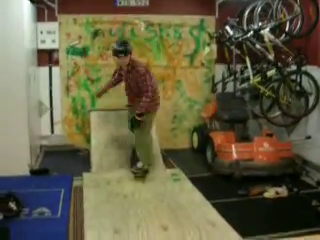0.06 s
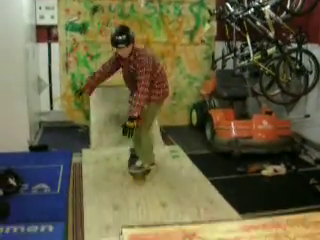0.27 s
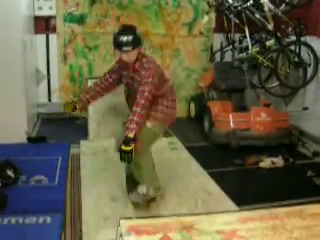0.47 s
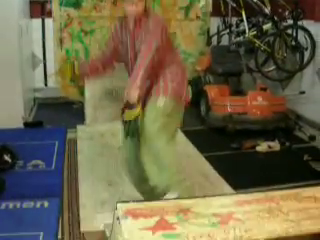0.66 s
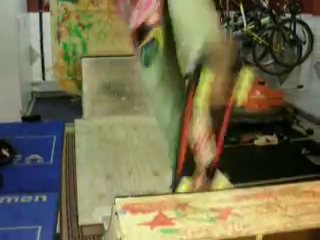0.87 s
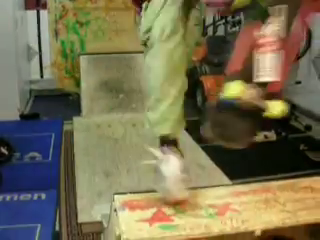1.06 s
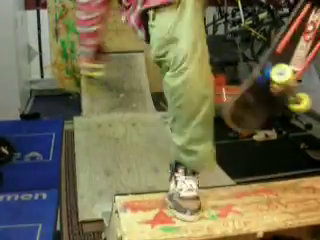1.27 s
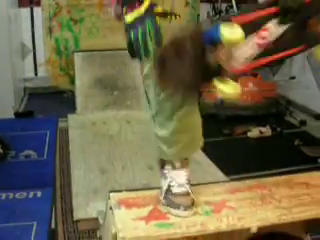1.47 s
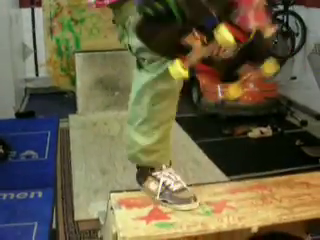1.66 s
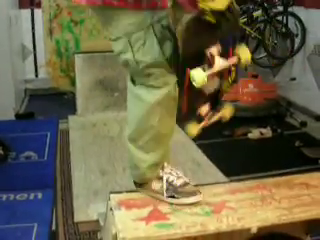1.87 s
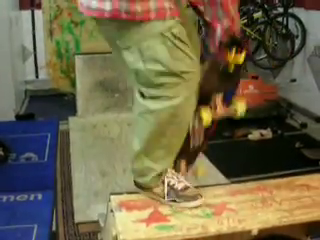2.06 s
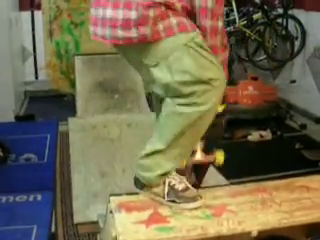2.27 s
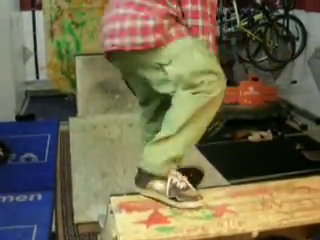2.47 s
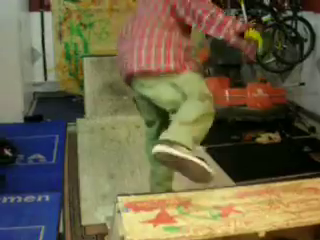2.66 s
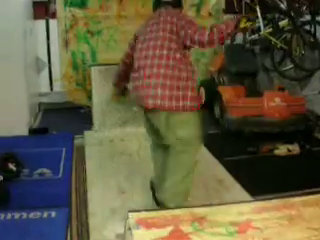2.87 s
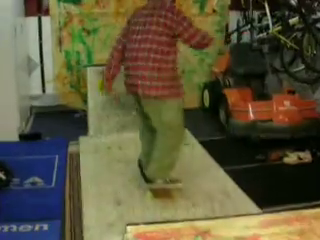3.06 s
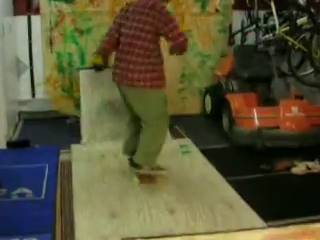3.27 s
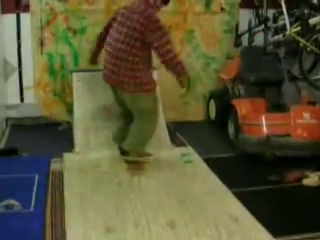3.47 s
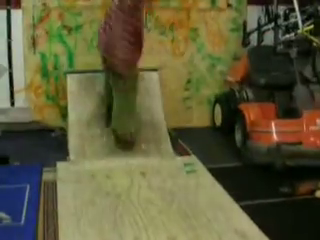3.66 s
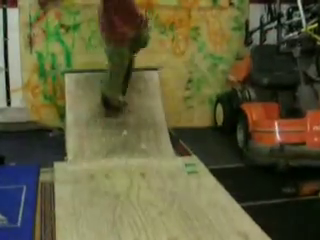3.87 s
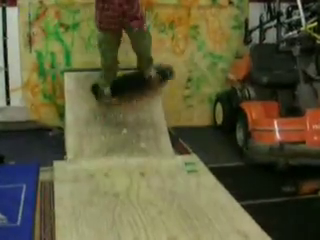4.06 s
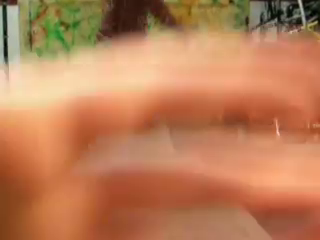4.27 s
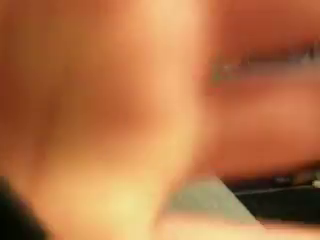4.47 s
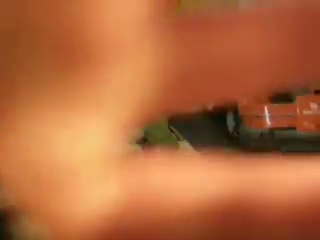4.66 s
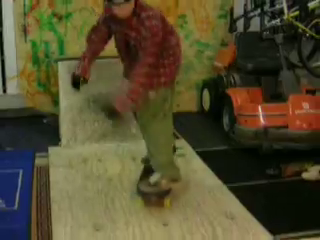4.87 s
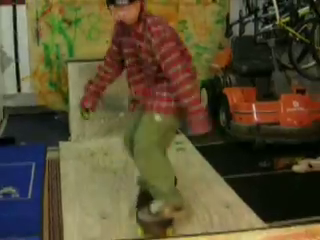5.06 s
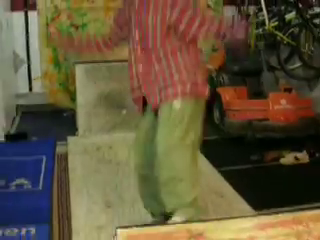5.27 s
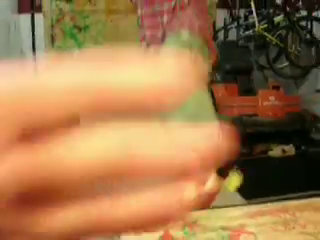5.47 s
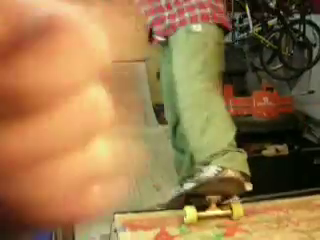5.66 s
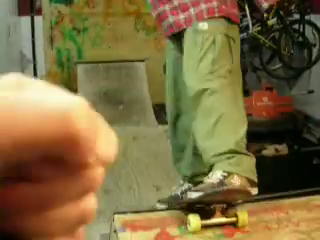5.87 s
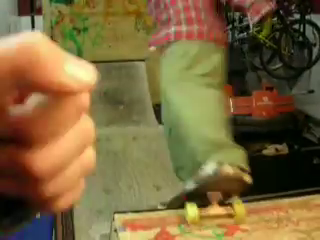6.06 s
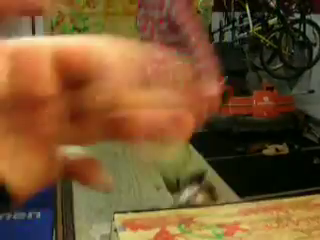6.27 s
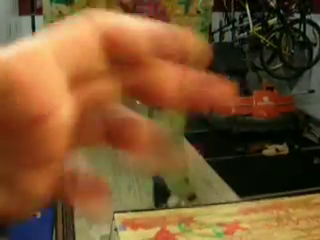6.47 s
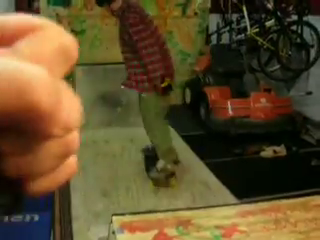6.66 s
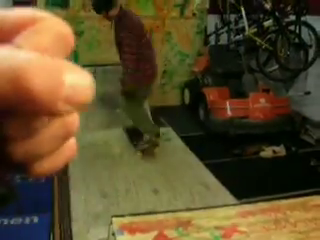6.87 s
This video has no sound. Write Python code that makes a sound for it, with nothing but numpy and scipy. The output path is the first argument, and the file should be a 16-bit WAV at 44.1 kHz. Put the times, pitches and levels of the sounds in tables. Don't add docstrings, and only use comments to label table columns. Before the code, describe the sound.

Close, boxy skateboarding indoors: wheels drum on plywood in uneven passes, broken by dull raps, sharp slaps and booming board landings.

```python
import sys
import numpy as np
from scipy import signal
from scipy.fft import rfft, irfft
from scipy.io import wavfile
from scipy.ndimage import uniform_filter1d

SR = 44100
rng = np.random.default_rng(int(sys.argv[2]) if len(sys.argv) > 2 else 0)


def gain_from_db(level_db):
    decades = np.asarray(level_db, float) / 20
    return 10 ** decades


def master(y):
    cut = np.clip(np.atleast_2d(y).T, -1, 1)
    pcm = np.round(cut * 32767)
    wavfile.write(sys.argv[1], SR, pcm.astype(np.int16))


N = 306054

# (frequency [Hz], width [Hz], level [dB])
PLYWOOD = [(114.05, 47, -14.5), (229.93, 27.4, 1.5), (290.36, 32.953, 1.5), (351.79, 45.64, 1),
           (451.1, 55, -2), (534.77, 47, 0.5), (628, 70, -0.5), (814.58, 140, -3.5), (849.5, 350, -15.5)]


def band(x, hz, width):
    return signal.lfilter(*signal.iirpeak(hz, hz / width, fs=SR), x)


def unit(x):
    return x / np.sqrt(np.mean(x ** 2))


def peak(x):
    return x / np.abs(x).max()


def body(x, modes):
    total = 0
    for k, (hz, width, db) in enumerate(modes):
        total = total + (-1) ** k * gain_from_db(db) * band(x, hz, width)
    return unit(total)


def grit(per_s, spread_db):
    hit = rng.random(N) < per_s / SR
    size_db = spread_db * np.minimum(rng.exponential(size=N), 3.5)
    return hit * rng.choice([-1, 1], N) * gain_from_db(size_db)


def flicker(rate):
    k = int(SR / rate)
    held = np.repeat(rng.standard_normal(N // k + 1), k)
    return gain_from_db(1.5 * uniform_filter1d(held, k)[:N])


def swells(start, stop, db, rise_db_per_s, fall_db_per_s):
    t = np.arange(0, N, 32)[:, None] / SR
    climb_db = rise_db_per_s * np.maximum(start - t, 0)
    fall_db = fall_db_per_s * np.maximum(t - stop, 0)
    return gain_from_db(db - climb_db - fall_db)


def layer(*parts):
    power = sum(np.sum((gains * gain_from_db(db)) ** 2, axis=1) for gains, db in parts)
    return np.interp(np.arange(N), np.arange(0, N, 32), np.sqrt(power))


def rolling():
    # (frequency [Hz], width [Hz], level [dB])
    deck = [(948.4, 510.1, -4), (1471.2, 401.64, -2.5), (1760.5, 335.77, -5.5)]
    # (frequency [Hz], width [Hz], level [dB])
    hiss_modes = [(2334.2, 500, -3.5), (3131.8, 892.9, 10), (3233.7, 1229.4, 8.5)]
    # (start [s], stop [s], rumble level [dB], hiss re rumble [dB])
    pass_rows = [
        (0.0, 1.076, -24, -21.5),
        (2.326, 3.72, -25, -9.5),
        (4.427, 5.26, -23.5, -8),
        (6.264, 6.939, -23, -10),
    ]
    # (peak time [s], rumble level [dB], time to fall 10 dB [s], hiss re rumble [dB])
    surge_rows = [(0.11, -13.5, 0.2484, -28), (0.46, -15, .1, -45), (0.55, -16, .15, -40),
                  (0.62, -12, 0.2351, -40), (0.79, -19, 0.1235, -28.5), (2.45, -18, 0.1722, -16),
                  (3.22, -24, .15, -14), (3.38, -20, 0.2348, -10.5), (3.53, -17.5, 0.2082, -6.5),
                  (4.45, -16, .1, -20.5), (4.76, -17.5, 0.2373, -16), (5.0, -20, 0.1754, -14.5),
                  (5.18, -17, .1, -12), (5.245, -13, .04, -11), (6.33, -22, 0.1188, -14),
                  (6.47, -14.5, 0.104, -10), (6.606, -18, 0.1753, -15), (6.94, -11.5, 0.2115, -10)]
    # (peak time [s], scuff level [dB], time to fall 10 dB [s], hiss re scuff [dB])
    scuff_rows = [(0.03, -21, .15, -9), (0.2, -27, .12, -10), (1.01, -22.5, 0.1599, -20.5),
                  (1.08, -27, 0.0011, -9), (1.26, -25.5, .1, -12), (1.31, -23.5, .1, -14),
                  (1.45, -30, 0.2128, -24), (1.58, -24, .2, -28), (1.7, -22.5, 0.193, -23.5),
                  (1.82, -23, .07, -30), (1.99, -22, 0.1224, -21.5), (2.12, -29.5, 0.3253, -15),
                  (2.438, -21.5, 0.0359, -14), (2.72, -35, .15, -1), (2.861, -28.5, 0.0687, 4.5),
                  (2.98, -26, 0.098, -11.5), (3.45, -28.5, 0.1172, -7), (3.627, -28.5, 0.0518, 8.5),
                  (3.97, -35, 0.2633, -5), (4.22, -28, .16, -2), (4.415, -20.5, 0.0184, -12),
                  (4.63, -26.5, 0.1023, -4.5), (5.199, -21.5, 0.1154, -4.5), (5.41, -31, .15, 1),
                  (5.62, -43, 0.6066, 4), (6.19, -42, .15, 3), (6.282, -24, 0.0579, -10)]

    start, stop, db, pass_hiss_db = np.transpose(pass_rows)
    passes = swells(start, stop, db, rise_db_per_s=301, fall_db_per_s=42)
    s, db, fall_s, surge_hiss_db = np.transpose(surge_rows)
    surges = swells(s, s, db, 10 / (0.49294 * fall_s), 10 / fall_s)
    s, db, fall_s, scuff_hiss_db = np.transpose(scuff_rows)
    scuffs = swells(s, s, db, 10 / (0.6235 * fall_s), 10 / fall_s)

    bumps = grit(per_s=1500, spread_db=2.5)
    rumble = flicker(33) * body(bumps, PLYWOOD)
    scrape = body(grit(per_s=2600, spread_db=2.0) + 0.64 * bumps, deck)
    scuff = flicker(40) * unit(band(scrape, 2056.2, 1500))
    hiss = flicker(45) * body(grit(per_s=6400, spread_db=-3.0) + .5 * bumps, hiss_modes)

    surge_scuff_db = -5 + .3 * surge_hiss_db
    rumble_gain = layer((passes, 0), (surges, 0), (scuffs, -7))
    scuff_gain = layer((passes, -8.5), (surges, surge_scuff_db), (scuffs, 0))
    hiss_gain = layer((passes, pass_hiss_db), (surges, surge_hiss_db), (scuffs, scuff_hiss_db))
    return rumble_gain * rumble + scuff_gain * scuff + hiss_gain * hiss


def air():
    # (frequency [Hz], density [dB per Hz])
    spectrum = [(15, -33.5), (25, 11.5), (60, -27), (176, -27.5), (275, -16.5), (412, -30), (658, 16.5),
                (867, -1.5), (4000, -24.5), (5200, -50), (8800, -120)]
    hz, db = np.transpose(spectrum)
    f = np.arange(N // 2 + 1) * SR / N + 1
    shape = gain_from_db(np.interp(np.log(f), np.log(hz), db))
    return gain_from_db(-46) * unit(irfft(rfft(rng.standard_normal(N)) * shape, N))


def knocks():
    raps = [(0.069, -1.5, 398, 9), (0.083, -5, 486.6, 2), (0.174, -2.5, 836.2, -4), (0.268, -4.5, 732, -3),
            (1.046, -8, 683.8, 5), (1.23, -20, 657, 8), (1.299, -21, 700, 2), (1.797, -8, 950, -2),
            (1.837, -13, 927.4, -2), (2.309, -8.5, 599.5, -4), (6.149, -24, 628.4, 5),
            (6.792, -15, 460, 10)]
    thumps = [(0.092, -9.5, 458, 8), (0.627, -11, 550.5, -3), (0.999, -8.5, 799, 3), (2.334, -9, 706.1, -8),
              (2.526, -6, 685, -3), (2.649, -20, 586.8, 8), (2.82, -20, 798, -2), (3.487, -7.5, 664.2, -8),
              (4.945, -9.5, 528.7, 9), (5.205, -7, 580, 2), (6.101, -22, 900, 17), (6.589, -5.5, 572.5, 3)]
    slaps = [(0.435, -7.5, 540, -30), (0.546, -6, 589, -22), (0.683, -3, 630, -4), (0.763, -8, 800, -20),
             (0.891, -6, 660, -10), (3.587, -9, 702, 9), (4.401, -6.5, 530, 3), (5.38, -11, 794, -3),
             (5.736, -3.5, 681, 2), (6.134, -7, 670, -14), (6.257, -4.5, 956, -6)]
    cracks = [(1.631, -20, 895.6, -5), (1.959, -16.5, 637.9, 0), (2.408, -7, 646, 1),
              (2.544, -6, 610.3, -1), (2.981, -5.5, 549.5, -2), (3.604, -10.5, 533.4, -8),
              (3.702, -6, 616.6, 1), (4.17, -28, 925.9, 0), (4.589, -5, 516, -3), (4.724, -5.5, 714.4, -6),
              (6.53, -13.5, 428.7, 1)]
    slams = [(2.266, -5, 677.4, -1), (2.429, -8.5, 606.9, 0), (2.852, -6.5, 632.9, 0),
             (2.964, -17.5, 610, 4), (3.342, -20.5, 519.8, -1), (3.452, -13.5, 630, -2),
             (4.421, -8.5, 407.3, -3), (4.924, -12, 372, -4), (5.102, -10.5, 412, -4), (5.275, -14, 816, 9),
             (6.297, -7, 719, 0), (6.49, -6, 551.8, -2), (6.619, -17.5, 628, -2)]
    # (blows, crack [dB], ramp boom [dB], room share [dB])
    kinds = [(thumps, -26, 0.5, -9), (slams, -6.5, -0.5, -7.5), (raps, -26.5, -16.5, -8.5),
             (cracks, -5, -20.5, -6), (slaps, -5, -18, -11)]

    blows = [(*row, *kind) for rows, *kind in kinds for row in rows]
    out = np.zeros(N + SR)
    t = np.arange(int(.2 * SR)) / SR

    def decay(t60):
        return gain_from_db(-60 * t / t60)

    for blow, tail in zip(blows, echoes(count=len(blows))):
        s, db, hz, hard_db, crack_db, boom_db, share_db = blow
        share_db = share_db - .15 * (db + 9.5)
        crack_db = crack_db + hard_db
        noise = rng.standard_normal((3, len(t)))
        ring = np.sin(2 * np.pi * hz * t) + 0.3563 * np.sin(2 * np.pi * 1.5 * hz * t)
        rattle = unit(band(noise[0], hz, 1.1 * hz)) * decay(0.066975)
        crack = gain_from_db(crack_db + 8.0) * peak(band(noise[1], 1700, 2300) * decay(0.047))
        push = decay(0.0048) + 0.41 * noise[2] * decay(0.021)
        boom = gain_from_db(min(boom_db, 2)) * peak(body(push, PLYWOOD[:6]))
        near = 1.15 * ring * decay(.045) + 0.4907 * rattle + crack + boom

        click = band(t == 0, 2200, 4500)
        sent = 2.4066 * ring * decay(0.009532) + 28.618 * gain_from_db(crack_db) * click + boom
        heard = gain_from_db(share_db + 5.5) * signal.fftconvolve(sent, tail)
        heard[:len(t)] += near
        contact_hz = min(9000 * gain_from_db(.4 * crack_db), SR / 4)
        heard = signal.lfilter(*signal.butter(2, contact_hz, fs=SR), heard)
        at = int(s * SR)
        out[at:at + len(heard)] += gain_from_db(db) * heard
    return out[:N]


def echoes(count):
    # (centre [Hz], time to fall 60 dB [s], level [dB])
    room = [(193.7, 0.77, -1), (278.26, 0.48682, 9), (540, 0.6095, 2.5), (875.3, 0.7633, 2.5),
            (1312, 0.44324, 12), (1931.6, 0.3061, 14), (3460, 0.98, -19)]
    t = np.arange(int(.7 * SR)) / SR
    starts = rng.integers(0, 2 * SR, count)
    tails = 0
    for hz, t60, db in room:
        noise = band(band(rng.standard_normal(3 * SR), hz, 1.0575 * hz), hz, hz)
        tails = tails + gain_from_db(db - 60 * t / t60) * noise[starts[:, None] + np.arange(len(t))]
    tails = tails * np.clip(t / .008, 0, 1) ** 2
    return tails / np.sqrt(np.sum(tails ** 2, axis=1, keepdims=True))


def overloads():
    # (time [s], treble peak level [dB])
    overshoots = [(0.07, -26), (0.0817, -34.5), (0.0852, -32), (0.0926, -39.5), (0.173, -31), (0.1759, -36),
                  (0.1803, -40), (0.2694, -28), (0.5472, -37), (0.633, -39.5), (0.6853, -25.5),
                  (0.893, -35.5), (1.0075, -45), (2.2675, -19.5), (2.4269, -38), (2.5452, -40),
                  (2.8559, -30.5), (3.489, -44), (3.5896, -27), (3.5884, -19.5), (3.7045, -38),
                  (4.4003, -32.5), (4.7264, -20.5), (4.949, -43.5), (5.2777, -37), (5.7366, -20.5),
                  (5.739, -28.5), (6.26, -36), (6.2973, -34.5), (6.496, -35)]
    grazes = [0.4365, 2.9838, 3.4795, 4.4177, 4.43, 5.238, 5.2877, 5.3826, 5.39, 6.4817, 6.53, 6.5955]
    # (frequency [Hz], width [Hz], level [dB])
    shaved = [(5067.6, 2300, 10), (8346, 5200, -13), (12020, 4000, -25)]
    s, db = np.transpose(list(overshoots) + [(s, -51) for s in grazes])
    spikes = np.zeros(N)
    spikes[(s * SR).astype(int)] = gain_from_db(db) * rng.choice([-1, 1], len(s))
    ticks = sum(gain_from_db(g) * band(spikes, hz, width) for hz, width, g in shaved)
    return gain_from_db(7.5) * signal.sosfilt(signal.butter(3, 3600, "high", fs=SR, output="sos"), ticks)


def scene():
    return (knocks() + 0.83848 * rolling() + air())[None]


def low_pass(x):
    return signal.sosfilt(signal.butter(12, 15935, fs=SR, output="sos"), x)


def record(dry):
    x = signal.sosfilt(signal.butter(2, 190, "high", fs=SR, output="sos"), dry)
    x = signal.sosfilt(signal.butter(2, 3336.9, fs=SR, output="sos"), x)
    x = x + gain_from_db(-61.5) * unit(band(rng.standard_normal(N), 68, 110))
    taps = signal.firwin(131, 4066.3, window=("kaiser", 9.5), fs=SR)[None]
    offset = -.0219
    for limit in (.7, .72):
        limited = np.clip(x + offset, -limit, limit) - offset
        x = signal.fftconvolve(limited, taps, mode="same")
    mix = x + offset + overloads()
    return low_pass(mix)


dry = scene()
out = record(dry)
master(out)
```